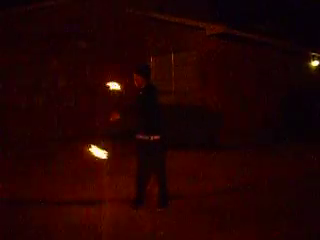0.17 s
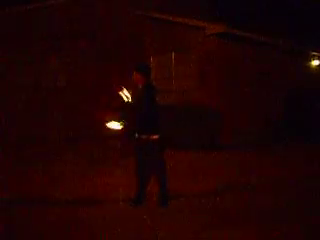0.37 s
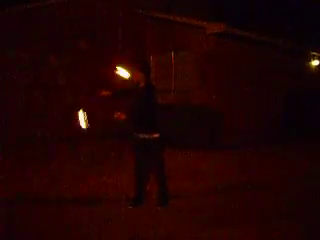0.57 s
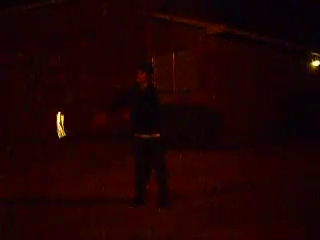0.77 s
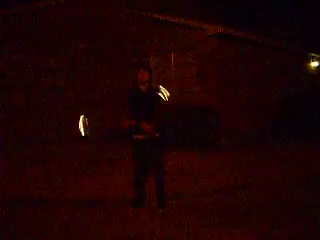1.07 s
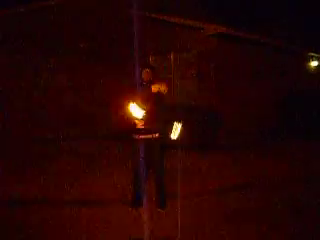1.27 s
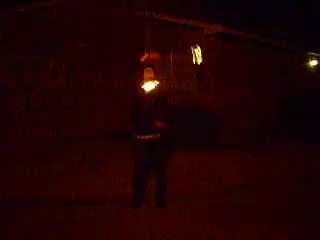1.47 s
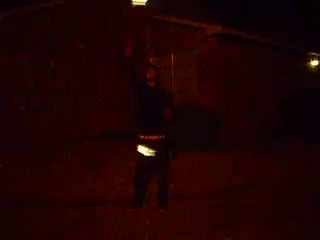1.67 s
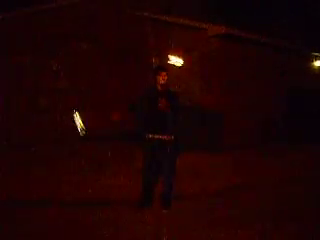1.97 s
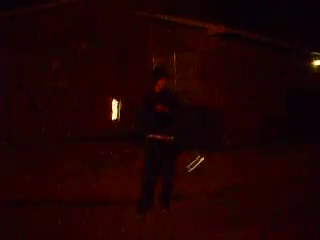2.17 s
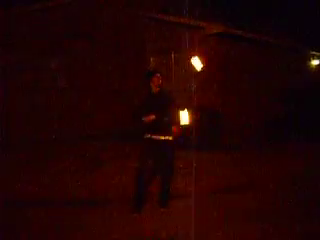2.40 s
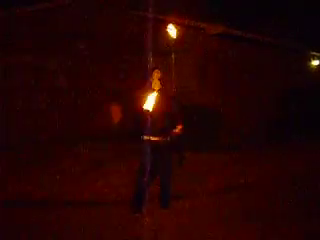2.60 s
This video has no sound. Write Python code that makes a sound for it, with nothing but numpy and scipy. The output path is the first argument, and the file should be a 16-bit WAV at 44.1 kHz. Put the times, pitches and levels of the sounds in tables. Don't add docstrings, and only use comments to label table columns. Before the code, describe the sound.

Flaming wicks on chains whoosh and flutter through night air, with brief chain clinks over distant rumble

```python
import sys
import numpy as np
from scipy import signal
from scipy.fft import rfft, irfft
from scipy.io import wavfile
from scipy.ndimage import uniform_filter1d

SR = 44100
rng = np.random.default_rng(int(sys.argv[2]) if len(sys.argv) > 2 else 0)


def linear_from_db(decibels):
    return 10 ** (np.asarray(decibels, float) / 20)


def log_audio(samples):
    frames = np.atleast_2d(samples).T
    limited = np.clip(frames, -1, 1)
    pcm = np.round(limited * 32767).astype(np.int16)
    wavfile.write(sys.argv[1], SR, pcm)


N = 120834

# [f/Hz, density/dB]
TRAFFIC_SPECTRUM = [(22, -14), (48, -4), (80, -4), (330, -12), (460, -13.5), (700, -14), (1450, -30),
                    (6400, -44.5)]
# [t/s, level/dB]
TRAFFIC_DRIFT = [(0, -0.2), (.75, -1), (.86, -2.5), (1.0, -1.5), (1.3, -2.5), (1.5, 0.5), (2.0, 0.3),
                 (2.35, -0.5), (2.46, -3.5), (2.63, -5.5), (2.68, -2.5), (2.74, 0)]
# [t/s, level/dB]
ENGINE_LOAD = [
    (0.0, -50),
    (0.71, -56.5),
    (1.59, -50.5),
    (1.63, -61),
    (1.7, -38.5),
    (1.78, -56),
    (1.82, -41),
    (2.07, -69.5),
    (2.1, -44.5),
    (2.74, -53.5),
]
# [t/s, level/dB, length/s, centre f/Hz]
GRIT_SCUFFS = [(0.688, -70, 0.046, 2250), (0.94, -68, 0.062, 2270), (1.496, -80, 0.016, 4300),
               (1.52, -70, 0.011, 4200), (1.577, -76, 0.0035, 3640), (1.62, -67.5, 0.018, 4370),
               (1.824, -80, 0.027, 4640), (1.882, -63, 0.046, 1910), (1.89, -75, 0.018, 4900),
               (1.966, -65, 0.008, 3700), (1.979, -64, 0.017, 1960), (2.071, -70.5, 0.031, 1980),
               (2.103, -72, 0.023, 4430), (2.146, -71, 0.01, 4300), (2.245, -66.5, 0.067, 3780),
               (2.406, -62.5, 0.005, 3400), (2.464, -64.5, 0.0052, 4000), (1.895, -64.5, 0.027, 1750),
               (2.04, -66, 0.023, 2000), (0.967, -72.5, 0.027, 2100), (1.48, -73, 0.0068, 3800),
               (1.559, -63.5, 0.0062, 3300), (1.596, -64.5, .012, 2600), (1.958, -66, .01, 1300),
               (1.72, -72.5, 0.056, 4800), (.2, -72.5, .15, 2200)]
# [t/s, peak level/dB, colour f/Hz]
CHAIN_TICKS = [(.5772, -59, 4500), (.8683, -54, 5000), (1.2931, -57, 3500), (1.4643, -49, 3900),
               (1.4675, -51, 3700), (1.4759, -45.5, 3900), (1.4818, -43.5, 4200), (1.4846, -45, 2700),
               (1.4909, -44.5, 5300), (1.5035, -51, 5000), (1.5084, -49, 3800), (1.5205, -52, 3800),
               (1.5436, -45, 4000), (1.5955, -48, 3800), (1.605, -50, 4000), (1.5544, -39.5, 3300),
               (1.5644, -42.5, 3500), (1.5825, -42.5, 3300), (1.8229, -52, 5000), (1.9542, -54, 4400),
               (1.9889, -51, 4500), (2.4089, -55, 3700), (2.6088, -51, 4000), (1.4945, -50, 2200),
               (1.5695, -50, 2800), (1.6015, -52, 5500), (1.6245, -50, 4200), (1.634, -53, 4300),
               (1.831, -52, 4000), (1.8435, -52, 4200), (1.883, -52, 5000), (1.9325, -53, 5500),
               (1.9705, -54, 3600), (2.02, -53, 4500), (2.0785, -53, 4000), (2.129, -54, 6000),
               (2.461, -54, 4000), (2.467, -56, 3500), (2.558, -55, 2200)]
# [f/Hz, level/dB, width/share of f]
LINK_MODES = [
    (1810, 9, 0.12),
    (2080, 0, .05),
    (2780, -6, 0.1),
    (3650, -10, 0.069),
    (4300, -9.5, 0.052),
    (6300, -8.5, 0.053),
]
# [t/s, level/dB, length/s]
CHAIN_SHAKES = [
    (1.61, -64, 0.034),
    (1.735, -74.5, 0.054),
    (1.875, -62, 0.027),
    (1.96, -59.5, 0.014),
    (2.072, -61, 0.037),
    (2.25, -74.5, 0.11),
]
# [t at the peak/s, peak level/dB, pitch f/Hz]
LINK_RINGS = [(1.479, -60, 3550.0), (1.521, -64, 4680), (1.559, -56, 3470), (1.558, -50, 1940),
              (1.595, -58, 4150), (1.602, -63.8, 6460.0), (1.604, -48.5, 1780), (1.623, -58, 1850),
              (1.629, -67, 6200), (1.751, -58.5, 2780), (1.793, -54, 2050), (1.822, -65, 6600),
              (1.823, -53, 1770), (1.839, -52, 1870.0), (1.858, -60, 4220.0), (1.86, -47.5, 2180),
              (1.882, -74, 6800), (1.9, -50, 1810.0), (1.906, -67, 3620), (1.932, -69, 6320),
              (1.954, -61, 4400), (1.962, -55, 3760), (1.962, -64, 6120), (1.97, -61, 2600),
              (1.97, -50, 1710), (1.975, -70.5, 6600), (1.535, -56, 2000), (2.108, -59, 2760),
              (2.023, -53.5, 2160), (1.562, -61, 2800)]
# [t/s, peak level/dB, pitch f/Hz]
FLAME_FLAPS = [(0.297, -39, 563), (0.633, -39, 590), (0.686, -34, 560), (1.158, -33, 631),
               (1.194, -32.5, 618), (1.348, -38, 736), (1.415, -33, 643), (1.712, -32.5, 575),
               (1.735, -48, 562), (1.751, -32, 623), (1.971, -31.5, 801), (2.038, -33, 695),
               (2.155, -48.5, 588)]
# [t/s, level/dB, length/s, roar centre f/Hz]
FLAME_PASSES = [(0.069, -54, 0.05, 650), (.19, -56, 0.073, 630), (0.38, -60, 0.073, 286),
                (0.647, -48, 0.026, 610), (0.719, -49.5, 0.032, 660), (0.645, -47.5, 0.032, 225),
                (.74, -49, 0.016, 297), (.67, -51.5, 0.024, 110), (.36, -53, 0.038, 83),
                (0.82, -54, 0.032, 570), (.96, -63, 0.029, 700), (1.1, -59, 0.017, 240),
                (1.07, -51, 0.021, 680), (1.184, -55, 0.055, 560), (1.5, -53.5, 0.027, 73),
                (1.39, -59.5, 0.032, 715), (1.53, -51, 0.077, 240), (1.77, -52.5, 0.09, 654),
                (1.78, -50, 0.053, 133), (1.85, -48, 0.028, 227), (1.87, -55.5, 0.02, 815),
                (1.98, -51, 0.027, 740), (1.955, -52, 0.11, 260), (2.05, -51.5, 0.018, 676),
                (2.23, -54, 0.14, 645), (2.18, -49.5, 0.021, 207), (2.282, -49, 0.056, 131),
                (2.66, -54.5, 0.027, 540), (2.72, -49, 0.041, 319), (.03, -53.5, 0.045, 87),
                (.72, -50, .045, 68), (1.07, -50.5, 0.015, 105), (1.13, -49.5, .035, 81),
                (1.69, -47.5, 0.037, 83), (1.4, -47.5, 0.029, 75), (1.7, -49, 0.014, 59),
                (2.16, -50.5, 0.035, 90), (2.42, -50.5, 0.042, 85), (2.68, -56, 0.051, 84.5),
                (0.596, -56, .015, 720), (0.884, -55.5, 0.054, 720), (1.05, -53.5, 0.0081, 720),
                (1, -52.5, 0.022, 700), (0.79, -57, 0.013, 340), (1.07, -53.5, .03, 324),
                (.63, -49, .015, 62), (.74, -49.5, .03, 160), (.93, -52.5, 0.023, 112),
                (1.69, -49, 0.032, 220), (1.7, -51.5, 0.027, 110)]


def level(x, db):
    return x * linear_from_db(db) / np.sqrt(np.mean(x ** 2))


def band(x, hz, width):
    edge = np.clip(hz * np.array([1 / (1 + width / 2), 1 + width / 2]), 5, .45 * SR)
    return signal.sosfilt(signal.butter(1, edge, "bandpass", fs=SR, output="sos"), x)


def walk(rate):
    hold = int(SR / rate)
    steps = np.repeat(rng.standard_normal(N // 20 + 1), hold)[:N]
    w = uniform_filter1d(uniform_filter1d(steps, hold), hold)
    return w / w.std()


def swell(at, length):
    i = np.arange(max(int((at - 3 * length) * SR), 0), min(int((at + 3 * length) * SR), N))
    return i, np.exp(-.5 * ((i / SR - at) / length) ** 2)


def uneven_hits(chance, rate, spread_db):
    return (chance[0] < rate / SR) * linear_from_db(-spread_db * np.log(chance[1] + .05))


def strikes(rows, t60, rise, width, db):
    out, t = np.zeros(N + SR), np.arange(SR // 10) / SR
    for at, peak_db, hz in rows:
        env = (1 - np.exp(-t / rise)) * np.exp(-np.log(1000) * t / t60)
        noise = band(rng.standard_normal(len(t)), hz, width)
        tone = np.sin(2 * np.pi * hz * t) * env + level(noise, -5) * env
        k = int(at * SR)
        out[k:k + len(t)] += tone * linear_from_db(peak_db + db) / np.abs(tone).max()
    return out[:N]


def distant_traffic():
    swell_db, flicker_db = -1.03, 1.3
    f = np.maximum(np.arange(N // 2 + 1) * SR / N, 1)
    hz, db = np.array(TRAFFIC_SPECTRUM).T
    colour = linear_from_db(np.interp(np.log2(f), np.log2(hz), db)) * f ** 2 / (f ** 2 + 14 ** 2)
    spec = rfft(rng.standard_normal(N)) * colour
    common_db = swell_db * walk(1.83)
    drift_db = np.interp(np.arange(N) / SR, *np.array(TRAFFIC_DRIFT).T)
    out = np.zeros(N)
    for octave in np.arange(3.5, 14, .5):
        part = np.cos(np.pi * np.clip(np.log2(f) - octave, -.5, .5)) ** 2
        follow = np.clip(1.2 - abs(octave - 9) / 2.0, .2, 1)
        gain = linear_from_db(common_db + flicker_db * walk(8.3) + drift_db * follow)
        out = out + irfft(spec * part, N) * gain
    return level(out, -46)


def engine_hum():
    speed_hz = 29 * (1 + .03 * walk(6))
    hum = np.sqrt(2) * np.sin(2 * np.pi * np.cumsum(speed_hz) / SR)
    return hum * linear_from_db(-2 + np.interp(np.arange(N) / SR, *np.array(ENGINE_LOAD).T))


def footfall():
    out = np.zeros(N)
    i, env = swell(2.708, 0.002)
    out[i] += linear_from_db(-35) * env
    return out


def grit_scuffs():
    grains = uneven_hits(rng.random((2, N)), 1500, 3.0) * rng.standard_normal(N)
    grit = level(grains, 0) + rng.standard_normal(N)
    out = np.zeros(N)
    for at, db, length, hz in GRIT_SCUFFS:
        i, env = swell(at, length)
        out[i] += env * level(band(grit[i], hz, .55), db)
    return out


def chain_ticks():
    width, t60_s, tail_db, tick_db = 1.2, .017, -20, 1.0
    out, t = np.zeros(N + SR), np.arange(SR // 20) / SR
    for at, peak_db, hz in CHAIN_TICKS:
        tail = rng.standard_normal(len(t)) * np.exp(-np.log(1000) * t / t60_s) * linear_from_db(tail_db)
        click = band(band((t == 0) + tail, hz, width), hz, width)
        k = int(at * SR) - np.abs(click).argmax()
        out[k:k + len(t)] += click * linear_from_db(peak_db + tick_db) / np.abs(click).max()
    return out[:N]


def chain_jingle():
    chain, shake = np.zeros(N), np.zeros(N)
    for hz, db, width in LINK_MODES:
        chance = rng.random((3, N))
        taps = uneven_hits(chance, 160, 3.0) * np.sign(chance[2] - .5)
        chain = chain + level(band(band(taps, hz, width), hz, 2 * width), db)
    for at, db, length in CHAIN_SHAKES:
        i, env = swell(at, length)
        shake[i] += linear_from_db(db) * env
    return level(chain, 0) * shake


def link_rings():
    lead_s = .002
    rows = np.array(LINK_RINGS) - [lead_s, 0, 0]
    return strikes(rows, t60=.024, rise=.0012, width=0.3, db=4.0)


def flame_flaps():
    return strikes(FLAME_FLAPS, t60=.04, rise=.002, width=.35, db=-7.0)


def flame_passes():
    roar_width, tear_from_hz = .5, 500
    out, air = np.zeros(N), rng.standard_normal((3, N))
    flutter = linear_from_db(1.6 * walk(50))
    tear = level(band(rng.standard_normal(N), 1700, 0.82), -19)
    for k, (at, db, length, hz) in enumerate(FLAME_PASSES):
        i, env = swell(at, length)
        roar = level(band(band(air[k % 3, i], hz, roar_width), hz, 2 * roar_width), 0)
        roar = roar * flutter[i]
        roar = roar * np.sqrt(np.mean(env ** 2) / np.mean((env * roar) ** 2))
        hiss = flutter[i] * tear[i] * min(hz / tear_from_hz, 1) ** 2
        out[i] += linear_from_db(db) * env * (roar + hiss)
    return out


def scene():
    rings, flaps = link_rings(), flame_flaps()
    far = distant_traffic() + engine_hum()
    flame = flame_passes() + flaps
    ground = grit_scuffs() + footfall()
    chain = chain_ticks() + chain_jingle() + rings
    return (far + ground + chain + flame)[None]


def roll_off(x):
    return signal.sosfilt(signal.butter(12, 7790, fs=SR, output="sos"), x)


def record(dry):
    mix = dry + linear_from_db(-15) * band(dry, 2480, 0.18)
    mix = signal.sosfilt(signal.cheby1(8, .3, 6740, fs=SR, output="sos"), mix)
    return roll_off(mix)


dry = scene()
out = record(dry)
log_audio(out)
```